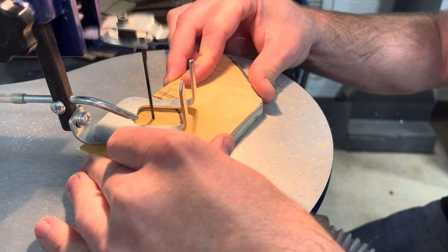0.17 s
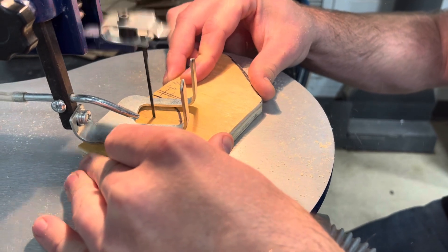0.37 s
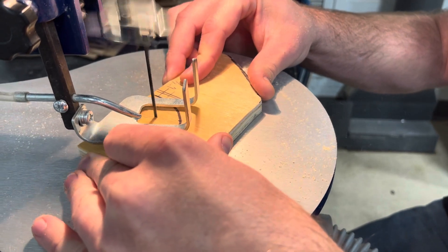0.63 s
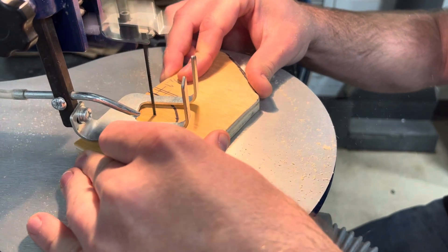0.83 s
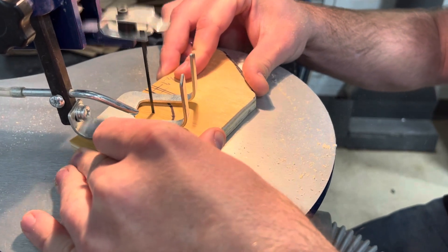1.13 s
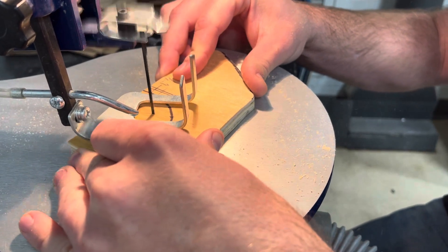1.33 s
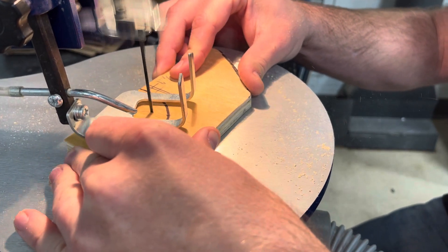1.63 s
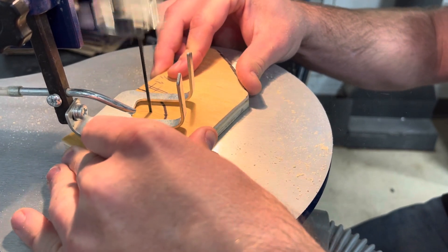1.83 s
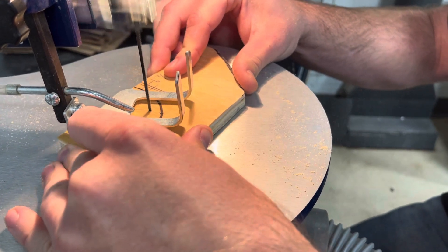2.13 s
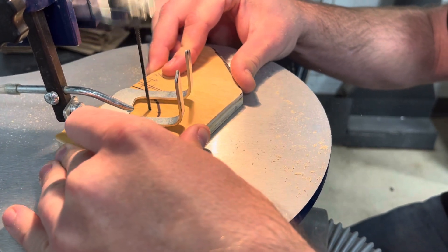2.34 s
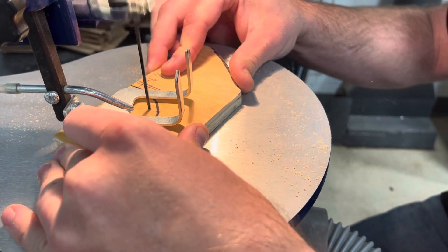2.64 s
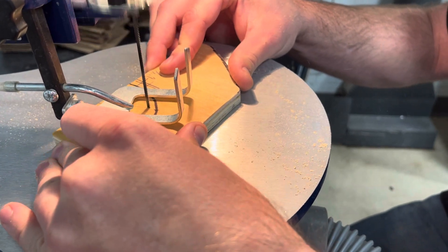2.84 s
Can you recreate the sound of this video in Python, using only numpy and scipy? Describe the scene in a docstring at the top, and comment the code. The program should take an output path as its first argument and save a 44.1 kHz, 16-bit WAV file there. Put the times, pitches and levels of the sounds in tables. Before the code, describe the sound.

Scroll saw cutting thin wood with a fast pulsing rasp, growing quieter near the end

```python
"""A scroll saw cuts plywood in a small workshop, about twenty strokes a second.
Each downstroke rasps (torn noise pulsed by the teeth), then the board knocks near 530 Hz (tooth force
through resonances); some strokes catch hard. The upstroke only rubs, over a steady grind of dust.
The arms knock and rattle in time, dry squeaks come late as the feed eases and the saw runs almost free,
and shaped noise makes the motor and air. A wall echo and a short tail surround the saw."""
import sys
import numpy as np
from scipy import signal
from scipy.fft import rfft, irfft
from scipy.io import wavfile
from scipy.ndimage import uniform_filter1d

SR = 44100
rng = np.random.default_rng(int(sys.argv[2]) if len(sys.argv) > 2 else 0)


def materialize(psi):
    """Save the field psi as 16-bit PCM at rate SR to the path in sys.argv[1].

    A 1-D psi becomes a single channel; in a 2-D psi each row is a channel.
    """
    bounded = np.clip(np.atleast_2d(psi).T, -1, 1)
    quanta = np.round(bounded * 32767).astype(np.int16)
    wavfile.write(sys.argv[1], SR, quanta)


N = 132300

FIRST_STROKE_S, STROKE_SCATTER_DB = -.008, 1.8
RING_S, RING_SHARE = 0.0025, 0.3  # short metallic ring of blade and table: decay time, share of power
PLAIN_BITE_DB = -21.5  # the rasp level at which colour and rise time are neutral

# Motor speed. Each row: time in seconds, strokes per second.
MOTOR_SPEED = [(0, 19.6), (2.0, 19.6), (2.25, 19.87), (3, 19.87)]
# The feed: bite of an ordinary stroke and side pressure on the upstroke. Each row: time in seconds,
# rasp level in dB and drumming level in dB (both before their trims), rubbing level in dB (before the
# rasp's share is added).
FEED_PRESSURE = [(0, -27.5, -20, -26), (.55, -28.5, -16.5, -23.5), (.9, -29, -13.5, -23.5),
                 (1.3, -30, -18, -19.5), (1.7, -31, -20, -18), (1.98, -30, -21, -23.5),
                 (2.16, -28, -13.5, -13.5), (2.25, -32, -17, -18), (2.34, -33.5, -25, -21),
                 (2.52, -38.5, -35, -25), (2.8, -37, -31.5, -23.5), (2.951, -34, -22.5, -22.5)]
# Strokes with set levels, from ordinary to hard catches. Each row: start in seconds, rasp level in dB
# and drumming level in dB (both before their trims).
LEVELLED_STROKES = [(0.094, -19, -9), (0.145, -25.5, -14.5), (0.247, -26.5, -15.5), (0.349, -26, -19.5),
                    (0.4, -25.5, -15.5), (0.451, -19.5, -11.5), (0.502, -21, -11), (0.604, -24, -16.5),
                    (0.706, -15.5, -9), (0.808, -21, -16.5), (0.859, -15, -4.5), (0.961, -19, -9.5),
                    (1.012, -27, -22), (1.063, -27, -16), (1.165, -27, -17.5), (1.268, -22, -13.5),
                    (1.37, -22.5, -13), (1.472, -26, -14), (1.523, -21, -14.5), (1.625, -24, -17.5),
                    (1.778, -24.5, -15), (1.829, -28.5, -15), (1.931, -25.5, -18), (2.033, -19, -12),
                    (2.084, -24, -14), (2.286, -27.5, -16.5), (2.387, -30, -19)]


def strokes():
    """One row (s, rasp dB, drumming dB) per turn of the crank, set by the feed unless listed in the table."""
    turns = np.cumsum(np.interp(seconds(N / SR + .1), *np.transpose(MOTOR_SPEED))) / SR
    starts = FIRST_STROKE_S + np.searchsorted(turns, np.arange(int(turns[-1]))) / SR
    s, feed_rasp_db, feed_drum_db, _ = np.transpose(FEED_PRESSURE)
    scatter = STROKE_SCATTER_DB * rng.standard_normal(len(starts))
    rasp_db = np.interp(starts, s, feed_rasp_db) + scatter
    drum_db = np.interp(starts, s, feed_drum_db) + scatter
    rows = np.column_stack([starts, rasp_db, drum_db])
    for at, *levels in LEVELLED_STROKES:
        rows[np.argmin(abs(starts - at)), 1:] = levels
    return starts, rows


def blade(rows):
    """Teeth strike the board and tear fibres going down; the blade rubs the kerf going up."""
    t = seconds(.1)
    drum, rasp, rub = np.zeros((3, N))
    for start, rasp_db, drum_db in rows:
        splinters, fibres, friction = rng.standard_normal((3, len(t)))
        tooth, bite = tooth_angle(t), bite_shape(t, rasp_db)
        add(drum, start, board_knock(t, tooth, bite, splinters, drum_db))
        grain = tooth_grain(tooth)
        add(rasp, start, tearing(grain * fibres, bite, rasp_db))
        add(rub, start, upstroke_rub(t, grain * friction, start, rasp_db))
    hiss = rasp + kerf_friction(rub + grinding_dust())
    ring = signal.fftconvolve(hiss, dying_noise(RING_S))[:N]
    return drum + np.sqrt(1 - RING_SHARE) * hiss + np.sqrt(RING_SHARE) * ring


TOOTH_HZ, TOOTH_SCATTER_HZ = 535.4, 14.3
TOOTH_SLOW_HZ, FASTEST_S = 14.5, 0.012  # drop in tooth rate one FASTEST_S away from mid-stroke
TOOTH_SLIP = 0.16  # spread of the starting phase, turns
TOOTH_GATE = 0.7  # how deeply the teeth pulse the noise
RASP_GRAIN_DB = 1.24


def tooth_angle(t):
    """One turn per tooth; the blade is fastest at mid-stroke."""
    slowing = TOOTH_SLOW_HZ * np.minimum((t / FASTEST_S - 1) ** 2, 2)
    hz = TOOTH_HZ + TOOTH_SCATTER_HZ * rng.standard_normal() - slowing
    return 2 * np.pi * (np.cumsum(hz) / SR + TOOTH_SLIP * rng.standard_normal())


def tooth_grain(tooth):
    """Passing teeth open and close the noise, roughened by random lumps."""
    return unit((1 + TOOTH_GATE * np.cos(tooth)) * lumpy(len(tooth), RASP_GRAIN_DB, size=30))


RASP_RISE_S, RASP_FALL_START_S, RASP_FALL_S = 0.0069, 0.0093, 0.011  # rise is for a plain bite
SLOW_RISE = 0.48  # growth of the rise time with bite, dB per dB
SHAPE_SCATTER, RAGGED_DB = .15, 1.4  # spread of rise and fall; unevenness within a stroke


def bite_shape(t, rasp_db):
    """Attack, hold and release of one rasp: deep bites build more slowly, and no two tear alike."""
    scatter = np.exp(SHAPE_SCATTER * rng.standard_normal(2))
    rise_s, fall_s = np.array([RASP_RISE_S, RASP_FALL_S]) * scatter
    rise_s *= amp(SLOW_RISE * (rasp_db - PLAIN_BITE_DB))
    attack = np.minimum(t / rise_s, 1)
    release = np.exp(-np.maximum(t - RASP_FALL_START_S, 0) / fall_s)
    return attack * release * lumpy(len(t), RAGGED_DB, size=180)


RASP_TRIM_DB = 1.5
BRIGHTEN, COLOUR_SCATTER_DB = 0.11, 0.22  # brightening in dB per octave per dB of bite; spread per point
# Colour of the cutting rasp at a plain bite. Each row: frequency in Hz, relative density in dB per Hz.
RASP_COLOUR = [(150, -48), (350, -17), (680, 8), (790, -3), (1090, 4), (1350, -2.5), (1620, -12),
               (1900, -5), (2500, -3), (3200, 2), (4000, 1), (5000, 4), (6100, 3), (6750, -11.5),
               (7250, -1.5), (8300, -18), (10000, -12.5), (12300, -8), (13200, -4.5), (14300, -10),
               (15500, -12.5), (16000, -16)]


def tear_colour(rasp_db):
    """The spectrum of one stroke's rasp: harder bites are brighter and each tears differently."""
    hz, db = np.transpose(RASP_COLOUR)
    tilt = BRIGHTEN * (rasp_db - PLAIN_BITE_DB) * np.log2(hz)
    return np.column_stack([hz, db + tilt + COLOUR_SCATTER_DB * rng.standard_normal(len(hz))])


def tearing(fibres, bite, rasp_db):
    """Wood fibres tear as noise pulsed by the teeth and swelled by the bite."""
    return amp(rasp_db + RASP_TRIM_DB) * bite * colour(fibres, tear_colour(rasp_db))


DRUM_TRIM_DB, DRUM_PEAK_S, DRUM_WIDTH_S = 1.5, 0.017, 0.01
DRUM_SCATTER_S, DRUM_RAGGED_DB = .0013, 1.5  # the board chatters a little differently under every stroke
BUZZ_DB, SPLINTER_RMS = 5.5, 1.4  # level of the tooth overtones; strength of the splintering noise
# Resonances of the board on the table, each run twice. Each row: frequency in Hz, half the bandwidth of
# one pass in Hz, relative level in dB.
BOARD_MODES = [(542, 137.4, 6.5), (670, 63, -8), (823, 110, -12), (1100, 150, -8), (1292, 110, -10),
               (1611, 106, -16)]


def board_knock(t, tooth, bite, splinters, drum_db):
    """Tooth beats, their overtones and splintering force the board's resonances."""
    since = t - DRUM_PEAK_S - DRUM_SCATTER_S * rng.standard_normal()
    push = np.exp(-abs(since / DRUM_WIDTH_S) ** 3) * lumpy(len(t), DRUM_RAGGED_DB, size=220)
    overtones = np.cos(2 * tooth) + np.cos(3 * tooth)
    force = push * np.cos(tooth) + bite * (amp(BUZZ_DB) * overtones + SPLINTER_RMS * splinters)
    board = np.zeros(len(t))
    for hz, width, db in BOARD_MODES:
        board += amp(db) * resonate(resonate(force, hz, 2 * width), hz, 2 * width)
    return amp(drum_db + DRUM_TRIM_DB) * board / abs(board).max()


RUB_FOLLOW = 0.39  # share of the rasp's dB added to the rubbing level
RUB_AT_S, RUB_WIDTH_S = .036, 0.0063


def upstroke_rub(t, friction, start, rasp_db):
    """The returning blade brushes the kerf: a soft swell of noise pulsed by the teeth."""
    s, _, _, rub_db = np.transpose(FEED_PRESSURE)
    level = amp(np.interp(start, s, rub_db) + RUB_FOLLOW * rasp_db)
    swell = np.exp(-.5 * ((t - RUB_AT_S) / RUB_WIDTH_S) ** 2)
    return level * swell * friction


GRIND_DB, GRIND_GRAIN_DB = -5.5, 0  # level against the feed's rasp; zero grain keeps the grind smooth


def grinding_dust():
    """Dust grinds in the kerf all through the stroke, as noise that follows the feed."""
    s, feed_db, _, _ = np.transpose(FEED_PRESSURE)
    level = amp(GRIND_DB + np.interp(np.arange(N) / SR, s, feed_db))
    return level * lumpy(N, GRIND_GRAIN_DB, size=60) * rng.standard_normal(N)


# Colour of rubbing and grinding. Each row: frequency in Hz, relative density in dB per Hz.
RUB_COLOUR = [(200, -9.5), (660, 23.5), (790, 5.5), (1050, 16), (1300, 6.5), (1600, 6), (1900, -2),
              (2400, 3.5), (3200, 4.5), (4200, 4), (5400, 3), (6200, 5.5), (6900, -10.5), (7500, 0),
              (8400, -18), (11000, -13), (14500, -5.5), (16000, -6.5)]


def kerf_friction(x):
    """Blade and dust share the colour of friction in the kerf."""
    return colour(x, RUB_COLOUR)


SQUEAK_HZ, SQUEAK_WIDTH_HZ, SQUEAK_S = 4650, 68, 0.028
# The dry blade squeaks in the kerf. Each row: start in seconds, level in dB (peak of an equally strong sine).
BLADE_SQUEAKS = [(2.512, -36), (2.69, -38), (2.712, -42)]


def squeaks():
    """Brief unsteady whistles of the lightly loaded blade: noise through a narrow resonance."""
    t, out = seconds(SQUEAK_S), np.zeros(N)
    for start, db in BLADE_SQUEAKS:
        # the resonance has settled by the end of the longer noise
        whistle = resonate(rng.standard_normal(SR // 10), SQUEAK_HZ, SQUEAK_WIDTH_HZ)[-len(t):]
        add(out, start, amp(db) * np.sin(np.pi * t / SQUEAK_S) * unit(whistle) / np.sqrt(2))
    return out


KNOCK_AT_S = .014  # after the start of the stroke
BASS_EDGE_HZ = 119  # lower edge of the knock's band; keeps the deep bass out of the frame's knock
RATTLE_DB, RATTLE_FALL_S = -45.5, 0.066
# Modes of the arms and frame. Each row: frequency in Hz, level in dB before the band filter,
# 60 dB decay time in seconds.
FRAME_MODES = [(144, -52.5, 0.16), (165.8, -45.5, 0.25), (246, -48, 0.17), (351.4, -47, 0.24),
               (424.2, -45.5, 0.24), (514.2, -30.5, 0.21), (580, -31.5, 0.035), (639.7, -48.5, 0.46),
               (826, -43.5, 0.24), (932, -42.5, 0.2), (1060, -38.5, 0.056), (1293, -50.5, 0.34),
               (1451, -43, 0.15)]
# Rattle of the linkage. Each row: frequency in Hz, relative density in dB per Hz.
RATTLE_COLOUR = [(40, -31), (90, -3), (135, 7.5), (250, -13), (420, 9.5), (680, 9), (790, -20), (1050, -6),
                 (1250, 11.5), (1600, 6.5), (2000, 1), (5500, -8), (8500, -30), (16000, -65)]


def frame(starts):
    """Every turn of the crank gives the frame the same modal knock and noisy rattle."""
    t, kicks = seconds(.5), np.zeros(N)
    knock = np.zeros(len(t))
    for hz, db, t60 in FRAME_MODES:
        knock += amp(db - 60 * t / t60) * np.sin(2 * np.pi * (hz * t + rng.random()))
    band = signal.butter(4, [BASS_EDGE_HZ, 1800], "band", fs=SR, output="sos")
    knock = signal.sosfilt(band, knock)
    for start in starts:
        add(kicks, start + KNOCK_AT_S, np.ones(1))
    rattle = colour(signal.fftconvolve(kicks, dying_noise(RATTLE_FALL_S))[:N], RATTLE_COLOUR)
    return signal.fftconvolve(kicks, knock)[:N] + amp(RATTLE_DB) * unit(rattle)


ECHO_S, ECHO_DB, ECHO_EDGE_HZ = .0215, -7, 880  # a nearby wall returns mostly the drumming
ROOM_DB, ROOM_T60_S = -14, 0.56


def workshop(x):
    """One dull wall echo and a short diffuse tail."""
    tail = signal.fftconvolve(x, dying_noise(ROOM_T60_S / np.log(1000)))[:N]
    out = x + amp(ROOM_DB) * tail
    dull = signal.sosfilt(signal.butter(2, ECHO_EDGE_HZ, fs=SR, output="sos"), x)
    add(out, ECHO_S, amp(ECHO_DB) * dull)
    return out


FLOOR_DB = -44
# Motor and air. Each row: frequency in Hz, relative density in dB per Hz.
FLOOR_COLOUR = [(20, -21), (60, 0.5), (130, 0), (500, 16), (1100, 8), (2000, -1), (6000, -23), (8500, -13),
                (14500, -24), (16000, -29)]


def motor_and_air():
    """Steady coloured noise lies under the saw."""
    return amp(FLOOR_DB) * colour(rng.standard_normal(N), FLOOR_COLOUR)


def amp(db):
    """Turns dB into a linear gain."""
    return 10 ** (np.asarray(db) / 20)


def unit(x):
    """Scales to an rms of 1."""
    return x / np.sqrt(np.mean(x ** 2) + 1e-20)


def add(mix, s, sound):
    """Mixes a sound in at time s."""
    at = int(round(s * SR))
    sound = sound[max(-at, 0):]
    part = mix[max(at, 0):][:len(sound)]
    part += sound[:len(part)]


def colour(x, points):
    """Filters by a spectrum, keeping the power of white noise."""
    hz, db = np.transpose(points)
    bins_hz = np.fft.rfftfreq(len(x), 1 / SR)
    gain = amp(np.interp(np.log(bins_hz + 1), np.log(hz), db))
    return irfft(rfft(x) * unit(gain), len(x))


def resonate(x, hz, width):
    """A fixed resonance of gain 1."""
    r = np.exp(-np.pi * width / SR)
    return 2 * signal.lfilter([1 - r], [1, -r * np.exp(2j * np.pi * hz / SR)], x).real


def seconds(length):
    """A time axis."""
    return np.arange(int(length * SR)) / SR


def dying_noise(fall_s):
    """A noise burst of energy 1 that dies exponentially."""
    t = seconds(.5)
    burst = rng.standard_normal(len(t)) * np.exp(-t / fall_s)
    return burst / np.linalg.norm(burst)


def lumpy(length, depth_db, size):
    """A random gain of rms 1 with lumps about size samples long."""
    drift = unit(uniform_filter1d(rng.standard_normal(length), size=size))
    return unit(amp(depth_db * drift))


def scene():
    """The saw in its workshop, over the motor and air."""
    starts, rows = strokes()
    saw = blade(rows) + frame(starts) + squeaks()
    return (workshop(saw) + motor_and_air())[None]


EDGE_HZ = 15780


def record(dry):
    """A steep low-pass filter limits the treble."""
    lowpass = signal.firwin(511, EDGE_HZ, window=("kaiser", 9), fs=SR)
    return signal.oaconvolve(dry, lowpass[None], "same")


dry = scene()
out = record(dry)
materialize(out)
```